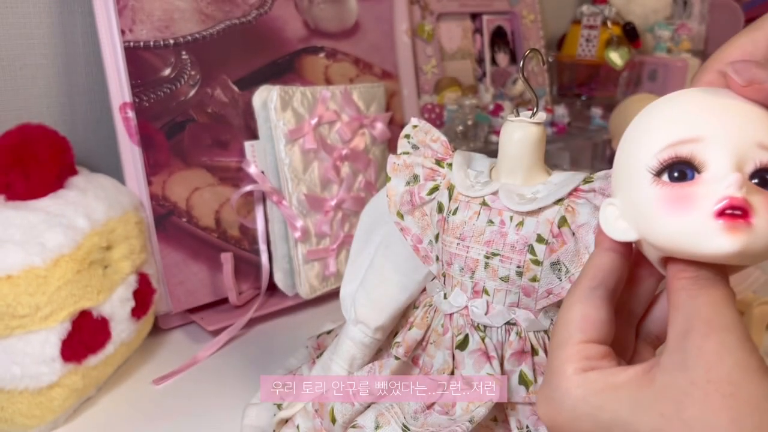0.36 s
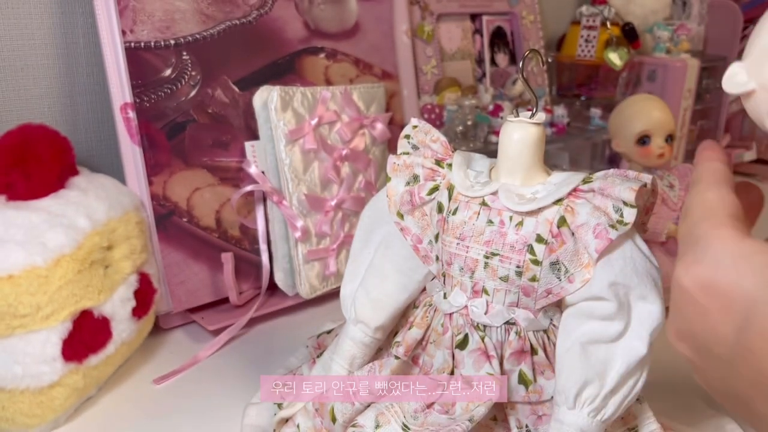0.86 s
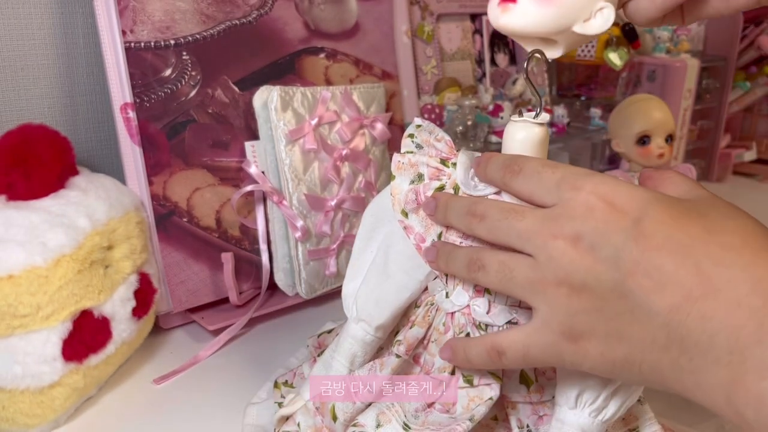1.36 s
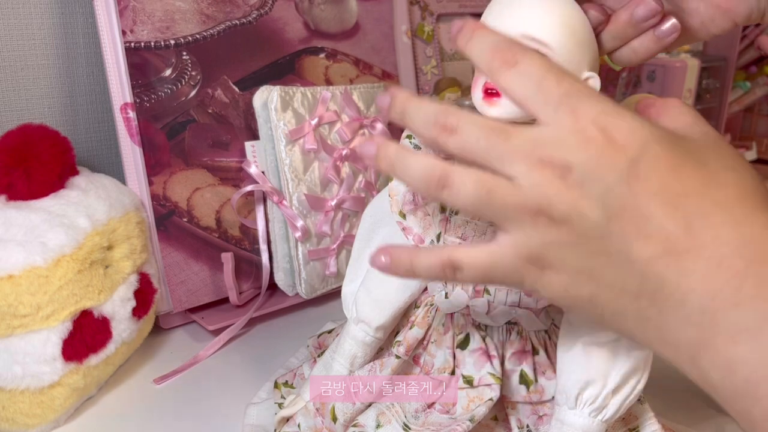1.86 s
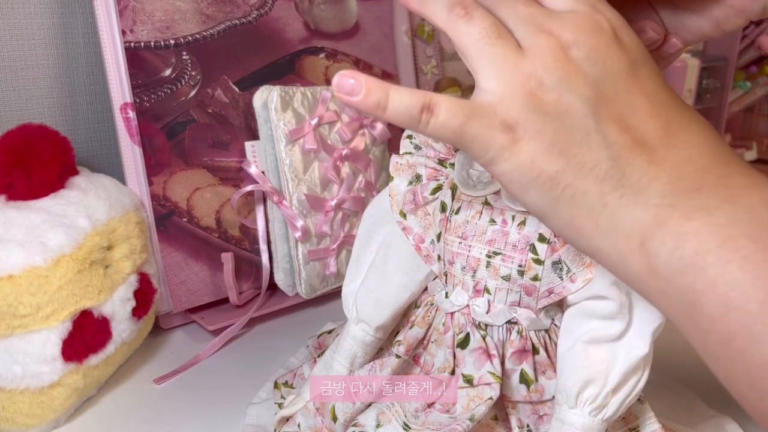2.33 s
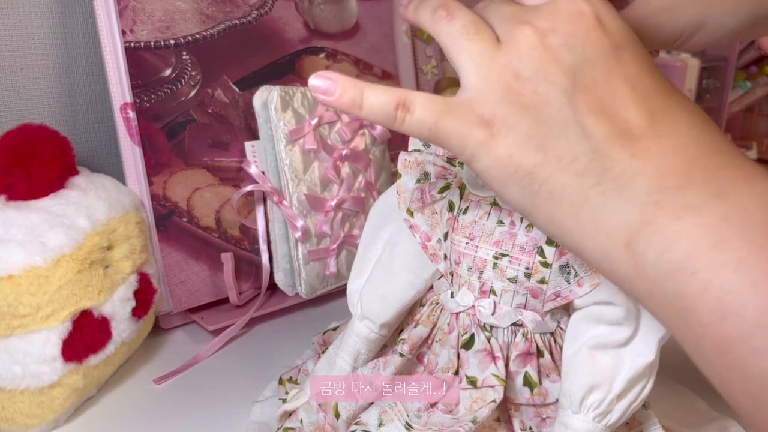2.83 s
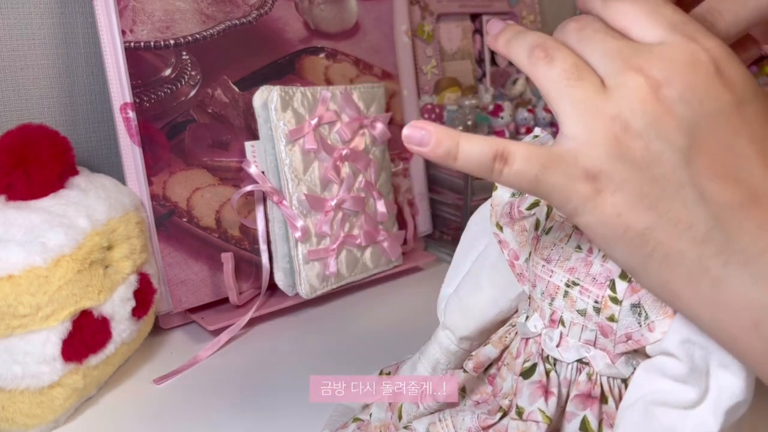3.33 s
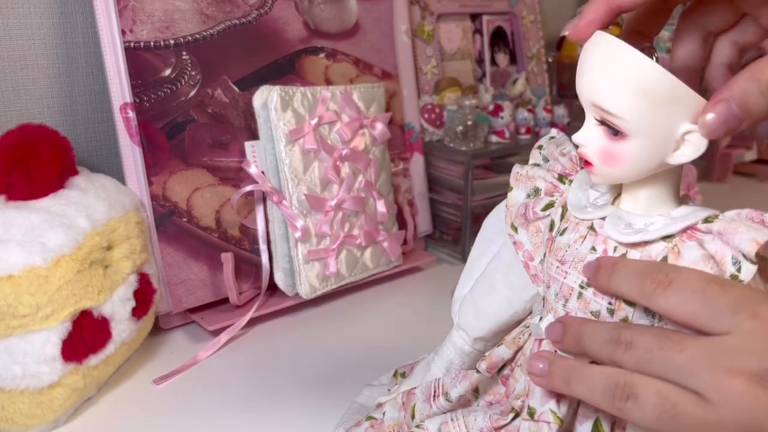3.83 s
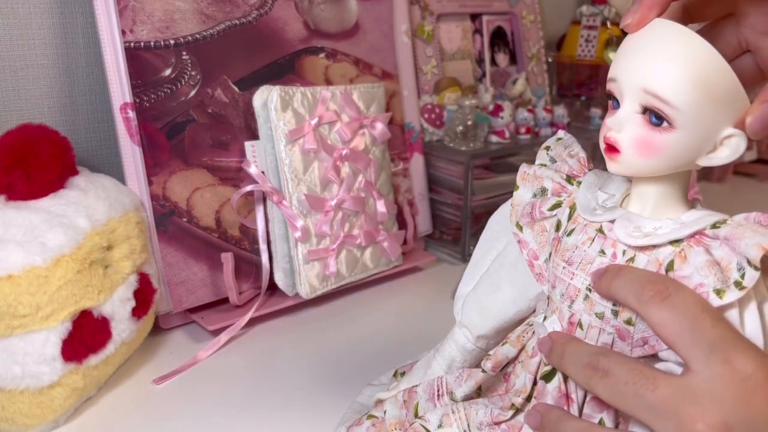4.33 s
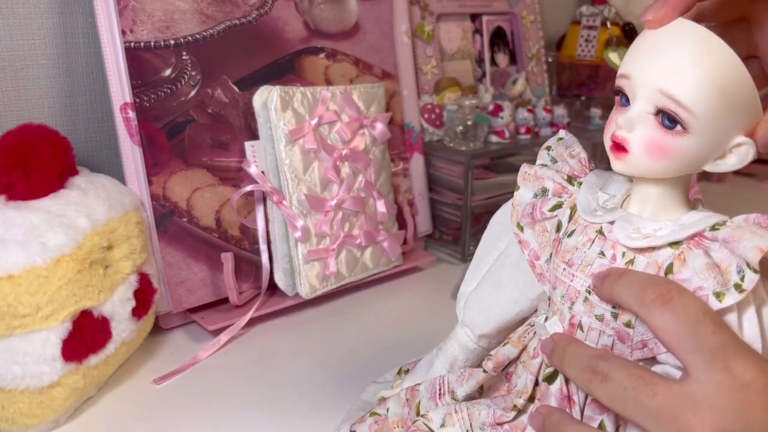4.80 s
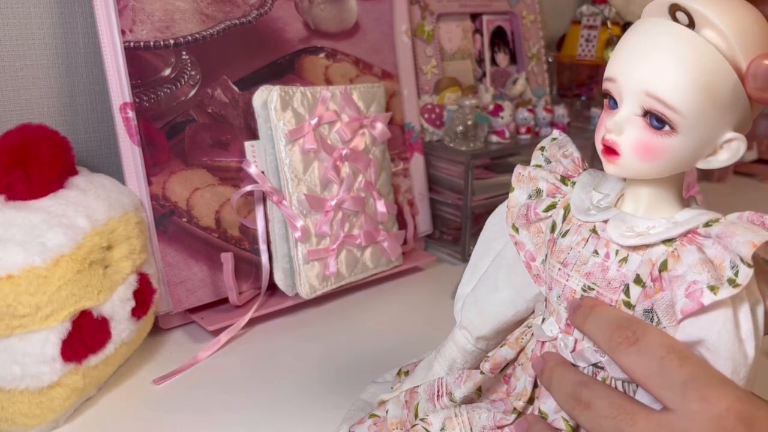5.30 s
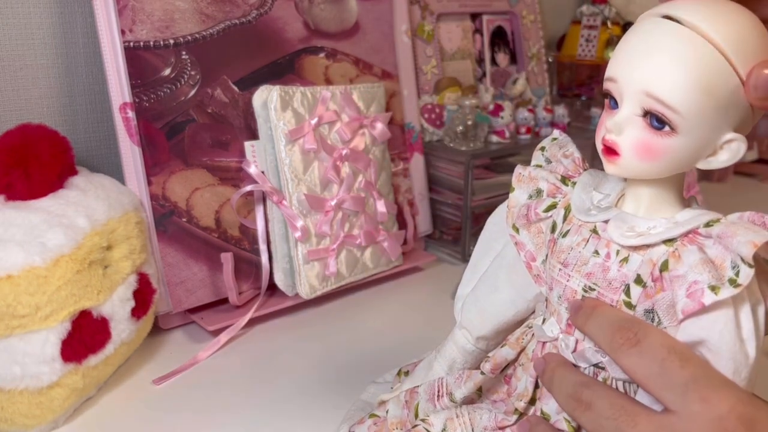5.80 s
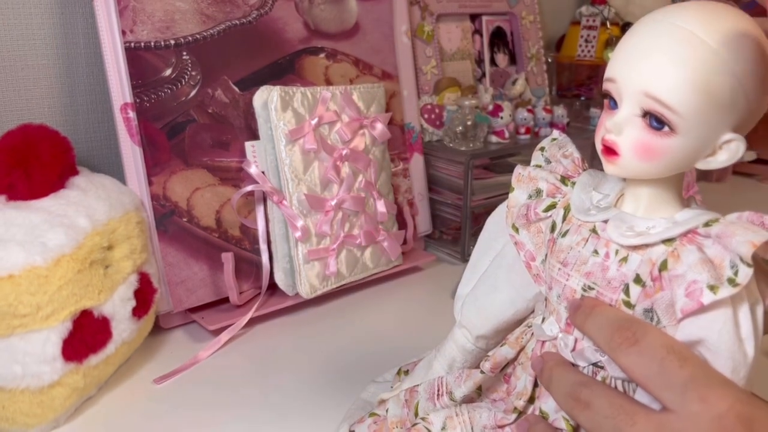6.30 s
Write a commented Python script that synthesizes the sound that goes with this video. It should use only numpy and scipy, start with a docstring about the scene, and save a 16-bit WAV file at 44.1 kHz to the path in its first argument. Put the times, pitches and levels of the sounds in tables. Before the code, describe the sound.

Hands handle a hollow resin doll close up: soft thumps, dry ticks, a juddering scrape, then one sharp bright snap in a quiet room.

```python
"""A low rumble and a faint hum fill a small, padded room, made of shaped noise and wavering sine tones.
Close to a phone, hands fit a hollow resin head onto a dressed doll on a table.
Bumps ring doll and table as fading tones; ticks and faint clicks are noise bursts shaped like resin.
Scrapes, squeaks and rustling cloth are lumpy or narrow noise; after a faint smear of noise,
a dense burst of cracks snaps the cap shut."""
import sys
import numpy as np
from scipy import signal
from scipy.fft import rfft, irfft, next_fast_len
from scipy.io import wavfile
from scipy.ndimage import uniform_filter1d, map_coordinates

SR = 44100
rng = np.random.default_rng(int(sys.argv[2]) if len(sys.argv) > 2 else 0)


def natural_amplitude(level_db):
    """Convert a level in decibels to a linear amplitude factor, elementwise."""
    exponent = np.asarray(level_db, float) / 20
    return 10 ** exponent


def log_audio(samples):
    """Write samples as a 16-bit WAV file to the path given in sys.argv[1]."""
    # one column per channel
    frames = np.atleast_2d(samples).T
    # limit to full scale, then quantise
    limited = np.clip(frames, -1, 1)
    pcm = np.round(limited * 32767).astype(np.int16)
    wavfile.write(sys.argv[1], SR, pcm)


N = 293706

# the long slide as the head is turned onto the neck: (time [s], scrape level [dB])
SLIDE = [(2.79, -90.5), (2.867, -72.5), (2.96, -64), (3.01, -63.5), (3.055, -56.5), (3.15, -58),
         (3.249, -64), (3.328, -114)]
# short strokes of the hands; the one at 5.841 s is instead a faint smear of noise just ahead of the snap;
# swell() stretches the length a little:
# (start [s], length [s], drag on the table or low noise [dB], resin scrape or high noise [dB], pitch [Hz])
STROKES = [(0.861, 0.069, -64, -78.5, 2080), (0.953, 0.18, -80, -79, 2500), (1.578, 0.05, -48.5, -71, 2370),
           (1.651, 0.14, -62, -70, 1780), (1.927, 0.057, -50.5, -66, 1820),
           (2.035, 0.063, -51, -75.5, 2370), (2.215, 0.024, -51.5, -77.5, 2660),
           (2.512, 0.071, -50, -74, 2670), (3.768, 0.4, -62, -87.5, 1750), (3.966, 0.094, -53, -73, 1510),
           (4.456, 0.18, -66, -82.5, 1280), (4.685, 0.12, -50.5, -79, 1770),
           (4.923, 0.047, -55, -64.5, 1300), (5.261, 0.15, -61.5, -100, 1850),
           (5.431, 0.22, -59, -84, 1000), (5.841, 0.046, -61, -50, 1904), (6.544, 0.18, -57, -83.5, 2056)]
# soft blows: (time [s], level [dB], touch [dB]); a light tap (+) loses this much in the lowest modes,
# a soft shove (-) in the upper ones
BUMPS = [(1.24, -47, 10), (1.323, -33.5, 17), (1.584, -40, 13), (1.921, -40, -2.5), (1.944, -38, 15),
         (1.955, -37, 4.5), (1.967, -38.5, -4), (2.056, -39, -3), (2.195, -30, -33), (2.506, -39, -8),
         (2.558, -42, 7.5), (2.73, -35.5, 18), (3.244, -34.5, 17), (3.896, -35, 16.5), (4.001, -30, -34.5),
         (4.278, -42.5, 6.5), (4.475, -48, 9), (4.684, -38, 16), (4.755, -44, 14), (4.937, -32.5, 22),
         (5.53, -40, 4), (5.639, -43.5, 24.5), (5.864, -24, 6), (6.618, -46.5, 23)]
# hard contacts of resin; those at 3.7233 and 5.2759 s are just faint clicks:
# (time [s], ring level [dB], treble level [dB], pitch [Hz])
TICKS = [(0.7335, -57.5, -55.5, 2710), (0.7632, -69, -64, 2970), (0.8756, -59, -65, 2300),
         (1.237, -65.5, -78, 2220), (1.515, -61, -79, 1300), (1.523, -56, -87, 2200),
         (1.578, -46.5, -67, 2880), (1.618, -59.5, -85, 2600), (1.905, -60, -81, 2720),
         (1.918, -58, -88, 2450), (1.942, -43.5, -66.5, 2000), (2.0726, -54, -67.5, 2470),
         (2.751, -64.5, -79, 2860), (3.3643, -58, -79, 3320), (3.7233, -64.5, -74, 2060),
         (4.008, -58, -64.5, 2550), (4.388, -59.5, -67, 2000), (4.475, -59.5, -94, 950),
         (4.9336, -49, -86, 1660), (5.2759, -65, -73, 1880), (5.635, -52, -98, 1110),
         (6.049, -64.5, -80, 1496), (6.6148, -50, -66, 2050)]
# fingers rub the cap while it nears the hollow, whose air resonance falls: (time [s], pitch [Hz], level [dB])
HOLLOW = [(5.43, 1470, -90), (5.515, 1300, -73), (5.56, 1190, -84), (5.715, 1000, -86)]
# squeaks and hisses of rubbed resin: (start [s], length [s], level [dB], first pitch [Hz], last pitch [Hz])
SQUEAKS = [(2.49, 0.091, -75.5, 2440, 2445), (3.97, 0.11, -81, 6240, 6160)]
# modes of doll and table: (usual pitch [Hz], level [dB], time to fall 60 dB after a firm touch [s])
BODY = [(67.14, -2.5, 0.52), (129.4, 13, 0.092), (148, 7, 0.093), (251.5, 9, 0.057), (342, 6.5, 0.053),
        (444, 2, 0.043), (510.7, 1.5, 0.039), (660, -4, 0.026), (766, -9, 0.02)]
# resonances of the resin shell: (pitch [Hz], width [Hz], level of one pass [dB])
RESIN = [(974, 190, 8), (1460, 349, 4), (1743, 100, 5.5), (1960, 210, 1), (2515, 460, 2.5), (3120, 440, 3),
         (3542, 495, 4), (4500, 650, -1)]
# tone of the top of a tick: (frequency [Hz], gain [dB])
BRIGHT = [(3500, 6), (5500, 11), (8400, 14), (12000, 0), (17000, -22)]
# tone of the cap's crack: (frequency [Hz], gain [dB])
CAP = [(600, -6.5), (3400, -17), (8400, -13), (12000, -23.5), (16500, -34.5)]
# resonances of the cap: (pitch [Hz], width [Hz], level [dB])
CAP_RING = [(1494, 330, -2.5), (1968, 420, -0.5), (2850, 400, -3.5), (4310, 220, -4.5), (5650, 130, -12)]
# tone of the rustling cloth, relative: (frequency [Hz], level per Hz [dB])
CLOTH = [(1500, -13), (3500, -6), (9000, -12), (12000, -3.5), (15000, -31)]
# tone of the room's rumble, relative: (frequency [Hz], level per Hz [dB])
RUMBLE = [(20, -52.5), (42, -20), (58, -6.5), (85, -11), (185, -18.5), (215, -27), (260, -21.5), (500, -39),
          (3800, -61), (15000, -69.5)]
# how alike diffuse sound is left and right: (frequency [Hz], likeness [-1 to 1])
ALIKE = [(60, 0.92), (180, 0.96), (550, 0.5), (1400, 0), (2500, 0.16), (8300, 0.76), (12000, 0.87),
         (14000, 0.57)]
# how far the left port is ahead of the right: (frequency [Hz], lead [radians])
LEAD = [(0, 0), (1400, -.3), (3400, .7), (4800, .5), (5500, -.8), (8300, -3.1), (11700, -6.3),
        (14500, -8.5)]
# how fast the room dies away: (frequency [Hz], time to fall 60 dB [s])
ROOM = [(150, 0.29), (1000, 0.2), (12000, 0.17)]
# hum of a distant appliance: (pitch [Hz], level [dB])
HUM = [(72.3, -53.5), (120.5, -66), (180.5, -67)]
# the dress rustles; swell() stretches the length a little: (start [s], length [s], level [dB])
RUSTLES = [(0.82, 0.072, -85), (0.93, 0.34, -85.5), (3.951, 0.12, -80), (4.074, 0.2, -85),
           (6.553, 0.32, -89)]


def unit(x):
    """Scales x to an average strength (rms) of 1."""
    return x / np.sqrt(np.mean(x ** 2) + 1e-20)


def along(points, hz):
    """Reads a value off (Hz, value) points, spaced as the ear hears pitch (log axis)."""
    f, v = np.transpose(points)
    return np.interp(np.log(hz + 1), np.log(f + 1), v)


def curves(rows):
    """Joins table rows into one value per sample for each column after the time."""
    s, *cols = np.transpose(rows)
    return [np.interp(np.arange(N) / SR, s, c) for c in cols]


def wobble(rate):
    """A smooth random curve with this many random points a second."""
    points = rng.standard_normal(int(N * rate / SR) + 4)
    return map_coordinates(points, [np.arange(N) * rate / SR])


def filtered(x, response):
    """Shapes x by a complex response, a function of frequency."""
    m = next_fast_len(N + SR // 2)
    return irfft(rfft(x, m) * response(np.fft.rfftfreq(m, 1 / SR)), m)[..., :N]


def modes(rows):
    """Response of (Hz, width, dB) resonances, which ring only after they are struck; signs alternate."""
    def response(f):
        return sum((-1) ** k * natural_amplitude(db) * 1j * f * w / (c * c - f * f + 1j * f * w)
                   for k, (c, w, db) in enumerate(rows))
    return response


def grit(rate, lumpy_db):
    """Friction noise whose force comes in lumps."""
    return rng.standard_normal(N) * natural_amplitude(lumpy_db * wobble(rate))


def swell(s, length):
    """Gain that swells fast and fades."""
    progress = np.clip((np.arange(N) / SR - s) / (1.09 * length), 0, 1)
    return np.sin(np.pi * progress ** 0.6)


def cracks(times, levels_db, t60, attack):
    """Short bursts of noise, one for each time, each of the energy its level asks for."""
    out, t = np.zeros(N + SR), np.arange(SR // 20) / SR
    shape = natural_amplitude(-60 * t / t60) * (1 - np.exp(-t / attack))
    for s, db in zip(times, levels_db):
        burst = shape * rng.standard_normal(len(t))
        burst *= np.linalg.norm(shape) / np.linalg.norm(burst)
        out[round(s * SR):][:len(t)] += natural_amplitude(db) * burst
    return out[:N]


def shell(hz):
    """The resin's resonances, steep-sided; a blunt contact hardly reaches above them."""
    return modes(RESIN)(hz) ** 2 / (1 + 1j * hz / 4500) ** 2


def voiced(noise, pitch_hz, spread):
    """Noise through the response of the resin shell, strongest around the given pitch."""
    hz = np.fft.rfftfreq(len(noise), 1 / SR)
    focus = modes([(pitch_hz, spread * pitch_hz, 0)])(hz) ** 2
    return irfft(rfft(noise) * shell(hz) * focus, len(noise))


def narrow(hz, db, span, width_hz):
    """A narrow band of noise on a moving centre, silent outside its span."""
    t = np.arange(N) / SR
    slow = filtered(rng.standard_normal((2, N)), lambda f: 1 / (1 + (f / width_hz) ** 2))
    turn = 2 * np.pi * np.cumsum(hz) / SR
    fade = np.clip(np.minimum(t - span[0][0], span[-1][0] - t) / 0.033, 0, 1)
    return natural_amplitude(db) * fade * unit(slow[0] * np.cos(turn) + slow[1] * np.sin(turn))


def diffuse(pair):
    """Two unrelated signals mixed to the likeness of the two ports."""
    def shares(hz):
        turn = np.arccos(np.clip(along(ALIKE, hz), -1, 1)) / 2
        return [np.cos(turn), np.sin(turn)]
    mid, side = filtered(pair, shares)
    return np.array([mid + side, mid - side])


def rumble():
    """Steady air of the room, alike in both ports in the bass, with a slightly wavering hum."""
    noise = filtered(rng.standard_normal((2, N)), lambda hz: natural_amplitude(along(RUMBLE, hz)))
    air = natural_amplitude(-55.5) * unit(diffuse(noise))
    t = np.arange(N) / SR
    for hz, db in HUM:
        level = np.sqrt(2) * natural_amplitude(db + 1.3 * wobble(4.9))
        air = air + level * np.sin(2 * np.pi * hz * t + 0.79 * wobble(0.6))
    return air


def room(x):
    """Each frequency of the room's answer dies at its own speed."""
    hz, t, z = signal.stft(rng.standard_normal((2, SR // 3)), SR, nperseg=256)
    tail = signal.istft(z * natural_amplitude(-60 * t / along(ROOM, hz)[:, None]), SR, nperseg=256)[1]
    tail = tail / np.linalg.norm(tail[0])
    late = np.pad(x, (200, 0))[None]  # the answer starts 200 samples late
    return diffuse(signal.fftconvolve(late, tail, axes=1)[:, :N])


def whistles():
    """The unevenly rubbed hollow of the head, and the gliding squeaks, as narrow noise."""
    out = natural_amplitude(6 * wobble(70)) * narrow(*curves(HOLLOW), HOLLOW, width_hz=75)
    for s, length, db, first_hz, last_hz in SQUEAKS:
        ends = [(s, first_hz, db), (s + length, last_hz, db)]
        out = out + natural_amplitude(5.5 * wobble(90)) * narrow(*curves(ends), ends, width_hz=first_hz / 24)
    return out


def strokes():
    """Lumpy friction drives body and shell, cloth rustles finely; the smear before the snap is made alike."""
    t = np.arange(N) / SR
    fade = np.clip(np.minimum(t - SLIDE[0][0], SLIDE[-1][0] - t) / 0.02, 0, 1)
    slide_db, = curves(SLIDE)

    def follow(full_db, slope, knee_db):
        """Gain that grows with the slide's scrape, but no more once that passes knee_db."""
        return fade * natural_amplitude(full_db + slope * np.minimum(slide_db - knee_db, 0))

    drag, cloth, shudder = follow(-46, 0.89, -75.5), follow(-80.5, 1, -64.5), follow(-45.5, 1.1, -59)

    def slide_tone(hz):
        return (modes([(1400, 2200, 3)])(hz) + 0.93 * modes(RESIN[2:3])(hz)) / (1 + 1j * hz / 2800)

    force = grit(120, lumpy_db=2.6)
    scrape = fade * natural_amplitude(slide_db) * unit(filtered(force, slide_tone))
    for s, length, low_db, high_db, pitch_hz in STROKES:
        gain, span = swell(s, length), slice(round(s * SR), round(s * SR) + SR // 3)
        drag = np.hypot(drag, natural_amplitude(low_db) * gain)
        scrape[span] += natural_amplitude(high_db) * gain[span] * unit(voiced(force[span], pitch_hz, spread=0.61))
    for s, length, db in RUSTLES:
        cloth = np.hypot(cloth, natural_amplitude(db) * swell(s, length))

    # the neck joint sticks and slips: 134.2 slips a second at the slide's fifth point,
    # falling by 160 Hz per second and wavering
    judder_hz = np.abs(134.2 - 160 * (t - SLIDE[4][0]))
    cycles = np.cumsum(judder_hz * (1 + 0.06 * wobble(25))) / SR
    slips = np.diff(np.floor(cycles), prepend=0) * natural_amplitude(3 * wobble(60))
    slips = slips + 0.064 * rng.standard_normal(N)

    body = [(hz, 3.05 / t60, db) for hz, db, t60 in BODY]  # width of a mode from its decay
    dragged = filtered(grit(80, lumpy_db=5), lambda hz: modes(body[2:])(hz) / (1 + 1j * hz / 900) ** 2)
    shaken = filtered(slips, lambda hz: modes(body[1:4])(hz) / (1 + 1j * hz / 130) ** 2)
    rustle = filtered(grit(130, lumpy_db=-2.0), lambda hz: natural_amplitude(along(CLOTH, hz)))
    return scrape + drag * unit(dragged) + shudder * unit(shaken) + cloth * unit(rustle)


def bumps():
    """Each soft blow rings the modes of doll and table at new strengths; high modes differ more by port."""
    out, t = np.zeros((2, N + SR)), np.arange(SR // 3) / SR
    for s, db, touch_db in BUMPS:
        # weak or padded contacts are duller, rise slower and die away sooner: damped
        dull_db = min(touch_db, 0) + 0.63 * min(db + 33.5, 0)
        soft = 1 - dull_db / 12
        start = round((s - 0.0012) * SR)
        for hz, level, t60 in BODY:
            tilt_db = np.interp(hz, [150, 220, 380, 480], [min(-touch_db, 0), 0, 0, dull_db])
            rise = (1 - np.exp(-t * hz / 0.8 / soft)) ** 2
            late = 0.1 / np.sqrt(hz)  # phase lag [s]: bending waves bring the high modes first
            skew = rng.normal() * (hz / 600) ** 2 * np.array([[1], [-1]])
            pitch_hz = hz * (1 + 0.069 * rng.normal())
            ring = np.cos(2 * np.pi * pitch_hz * (t - late) + skew)
            decay_db = -60 * t / t60 * soft ** 0.26
            gain = natural_amplitude(db + level + tilt_db + rng.normal(0, 3.2) + decay_db)
            out[:, start:][:, :len(t)] += gain * rise * ring
    return out[:, :N]


def ticks():
    """Resin contacts ring the shell near their own pitch, low ones narrowly; two faint clicks do alike."""
    s, _, treble_db, _ = np.transpose(TICKS)
    out, t = np.zeros(N + SR), np.arange(4096) / SR
    shape = natural_amplitude(-60 * t / 0.018) * (1 - np.exp(-t / 0.00022))
    for at, db, _, pitch_hz in TICKS:
        spread = 0.96 * min(pitch_hz / 2000, 1) ** 2
        ring = voiced(shape * rng.standard_normal(len(t)), pitch_hz, spread)
        out[round(at * SR):][:len(t)] += natural_amplitude(db) * ring / np.abs(ring).max()
    treble = cracks(s, treble_db, t60=0.0098, attack=0.00011)  # the sharper ones reach higher
    return out[:N] + filtered(treble, lambda hz: natural_amplitude(along(BRIGHT, hz)))


def snap():
    """The rim of the cap lands in a few contacts within some milliseconds: a dense crack rings the cap."""
    first_s, gap_s = 5.8612, 0.00075  # usual spacing, which varies at random
    k = np.arange(7)
    times = first_s + gap_s * (k + rng.uniform(-0.36, 0.36, k.shape))
    levels_db = 7.5 - 3 * abs(k - k.mean())  # the middle contact is the strongest
    spectrum = rfft(cracks(times, levels_db, t60=0.0042, attack=0.00014))
    power = np.abs(spectrum) ** 2
    even = np.sqrt(power.mean() / uniform_filter1d(power, 2000))  # every band gets its share of the force
    return filtered(irfft(spectrum * even, N), lambda hz: natural_amplitude(along(CAP, hz)) + modes(CAP_RING)(hz))


def scene():
    """The room answers all but its own rumble; friction, spread over the doll, arrives partly diffuse."""
    hard, rubbed = ticks() + snap(), strokes() + whistles()
    blows = bumps()
    direct = hard + blows + natural_amplitude(-0.5) * rubbed
    answer = natural_amplitude(-9.5) * room(hard) + natural_amplitude(-9.5) * room(blows[0]) + natural_amplitude(-2.0) * room(rubbed)
    return direct + answer + rumble()


def low_pass(x):
    """Removes everything above the highest recorded frequency."""
    return signal.sosfilt(signal.butter(12, 16840, fs=SR, output="sos"), x)


def record(dry):
    """The phone's two ports differ in phase and a little in level and lose the deepest bass."""
    def port_response(hz):
        lead = np.interp(hz, *np.transpose(LEAD)) * [[1], [-1]]
        return np.exp(0.5j * lead) * 1j * hz / (35 + 1j * hz)
    mix = filtered(dry, port_response) * natural_amplitude([[0.5], [-0.5]])
    return low_pass(mix)


dry = scene()
out = record(dry)
log_audio(out)
```